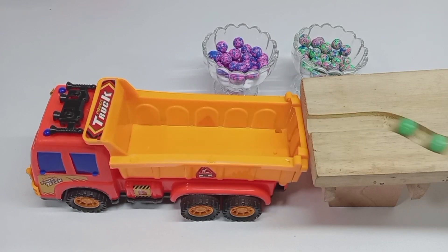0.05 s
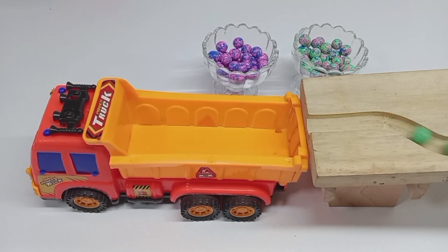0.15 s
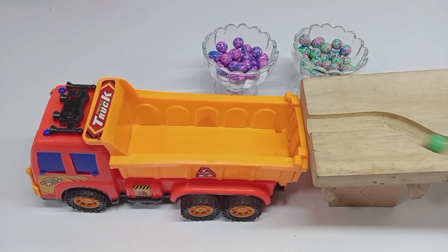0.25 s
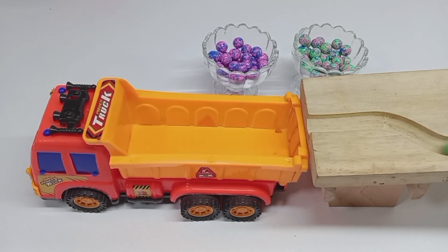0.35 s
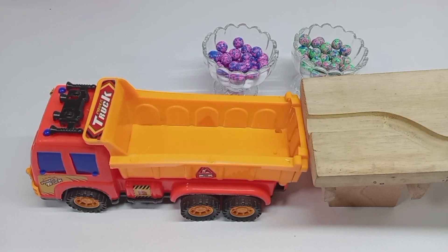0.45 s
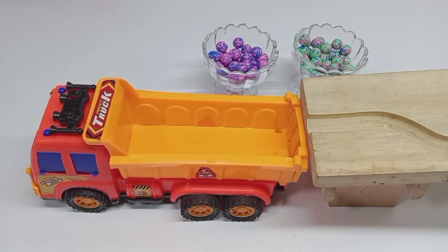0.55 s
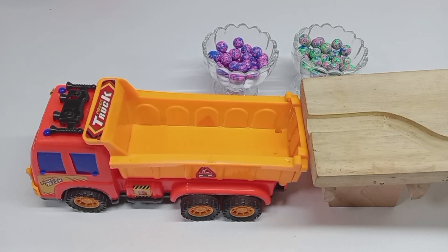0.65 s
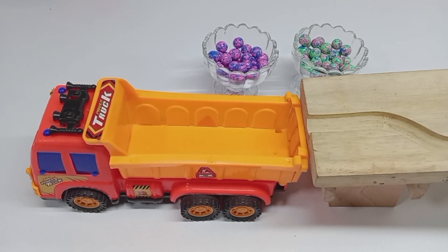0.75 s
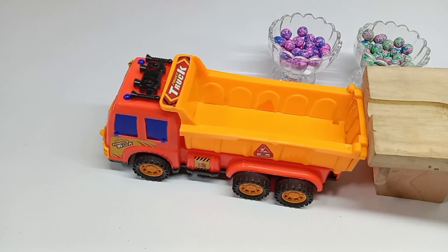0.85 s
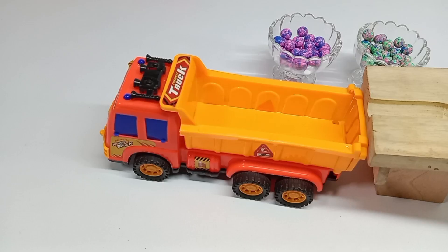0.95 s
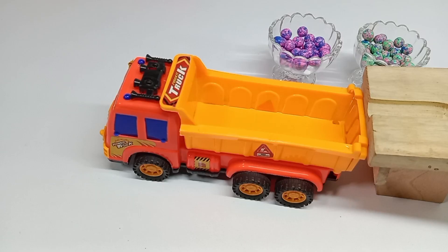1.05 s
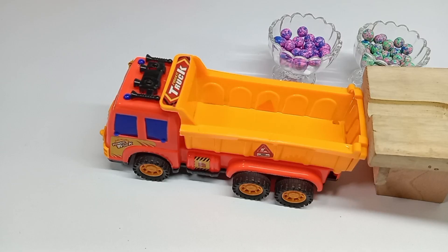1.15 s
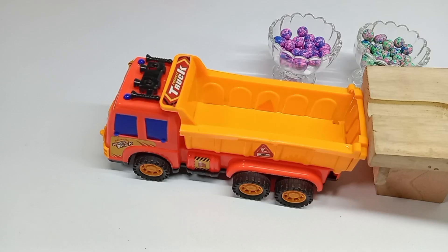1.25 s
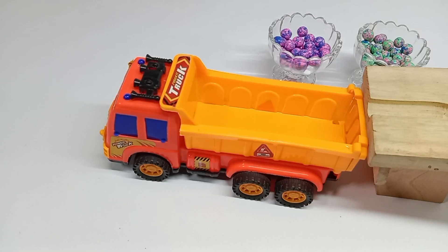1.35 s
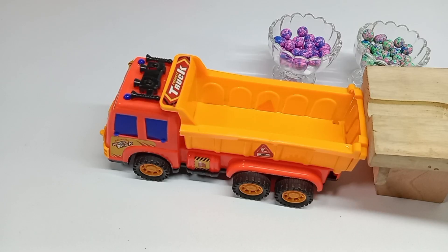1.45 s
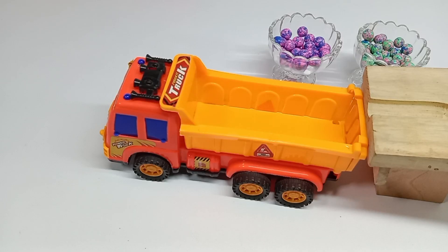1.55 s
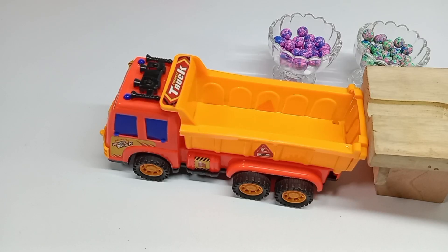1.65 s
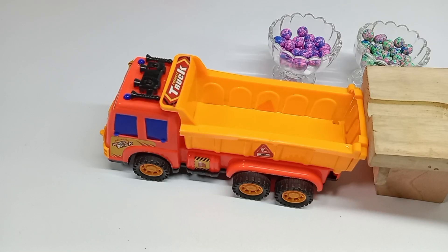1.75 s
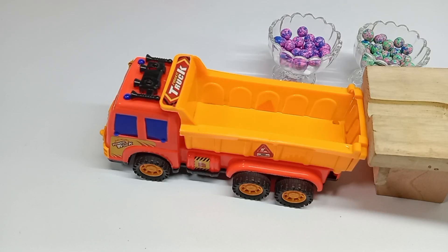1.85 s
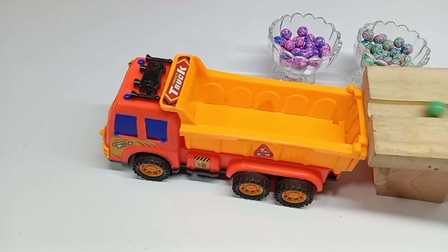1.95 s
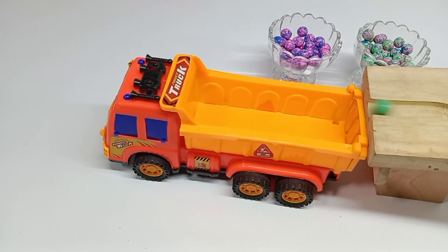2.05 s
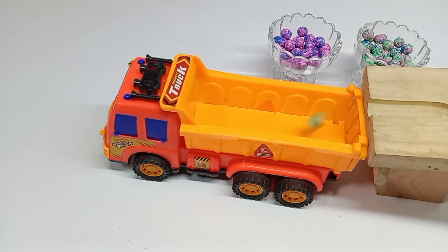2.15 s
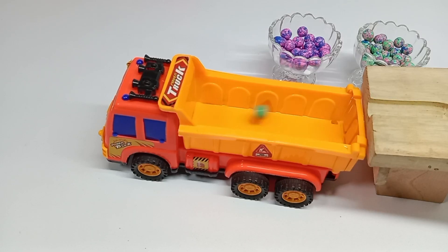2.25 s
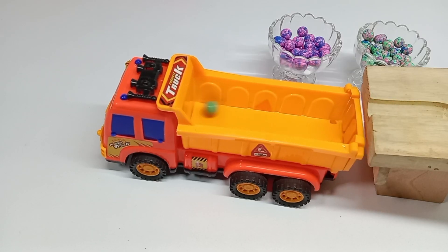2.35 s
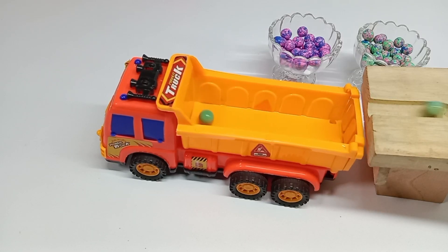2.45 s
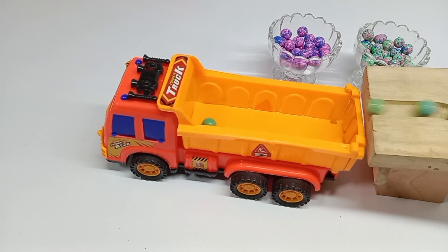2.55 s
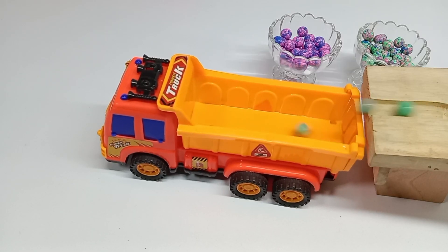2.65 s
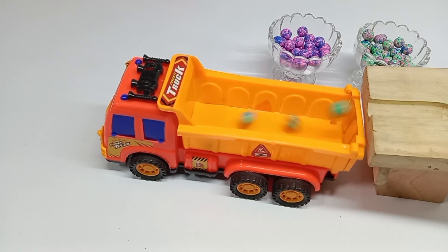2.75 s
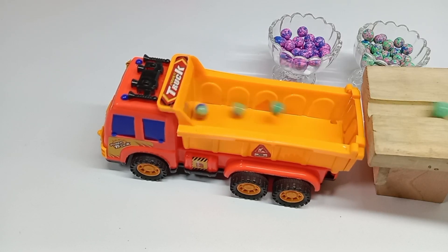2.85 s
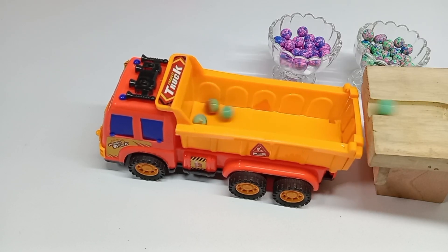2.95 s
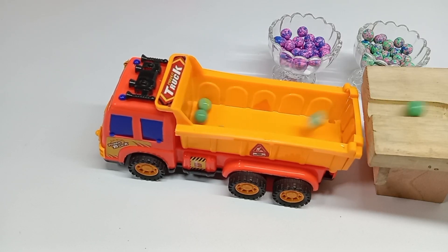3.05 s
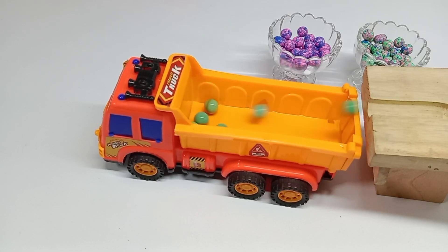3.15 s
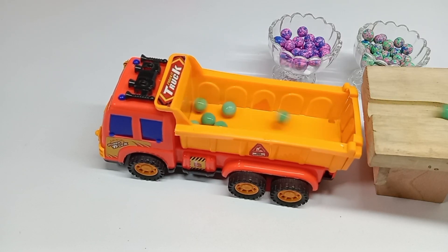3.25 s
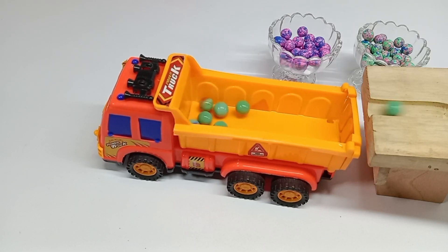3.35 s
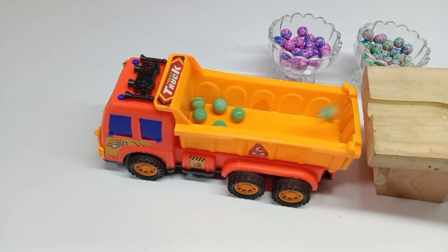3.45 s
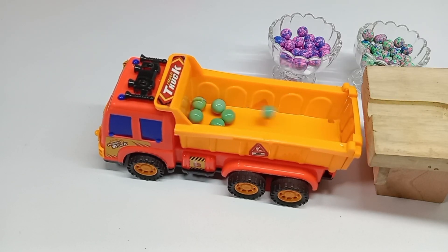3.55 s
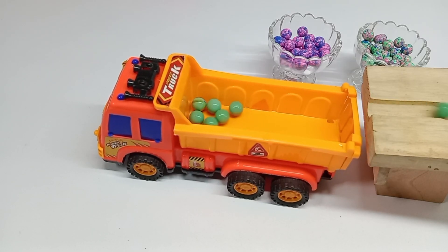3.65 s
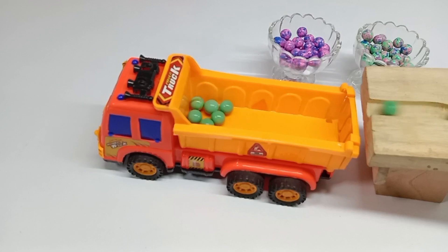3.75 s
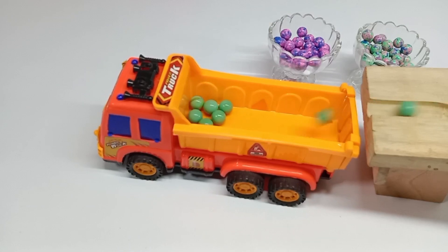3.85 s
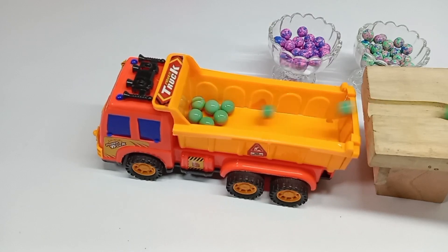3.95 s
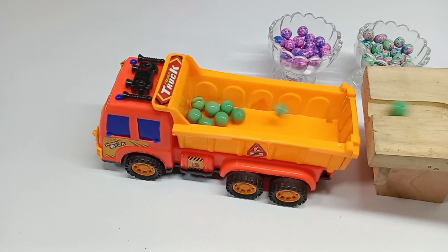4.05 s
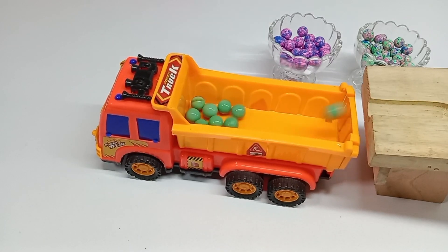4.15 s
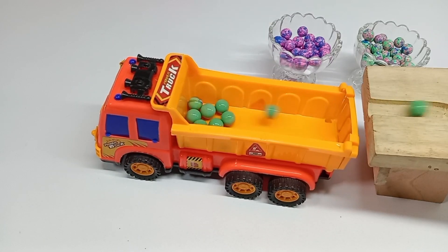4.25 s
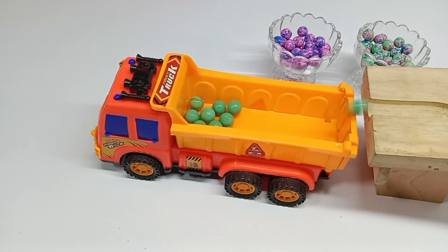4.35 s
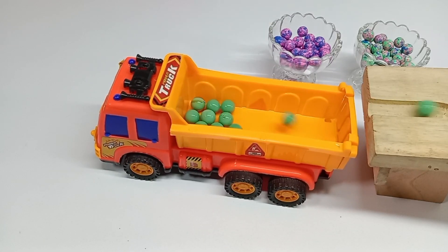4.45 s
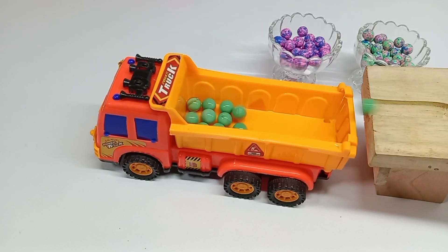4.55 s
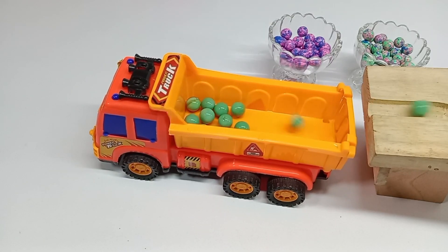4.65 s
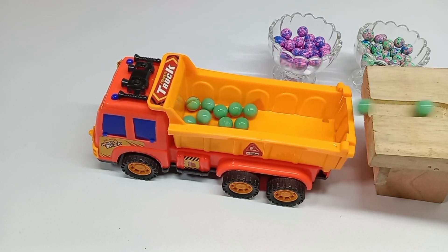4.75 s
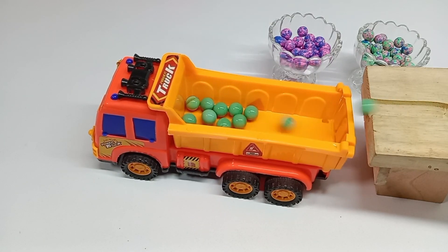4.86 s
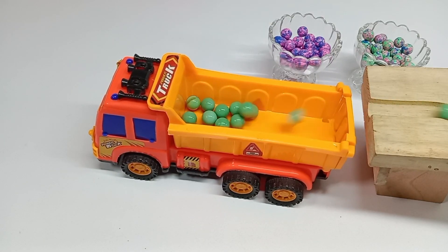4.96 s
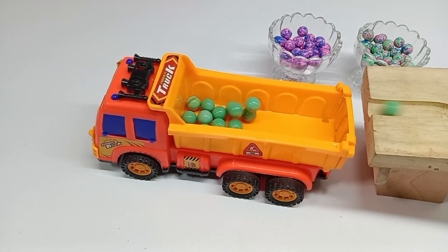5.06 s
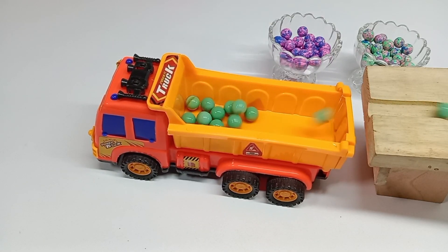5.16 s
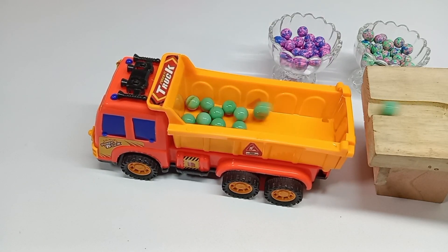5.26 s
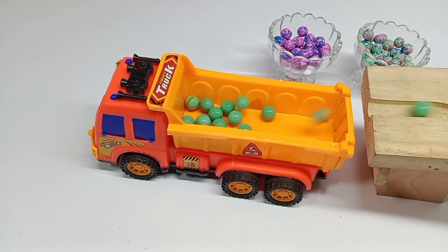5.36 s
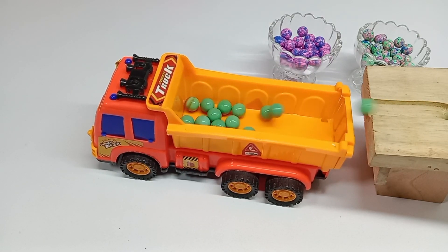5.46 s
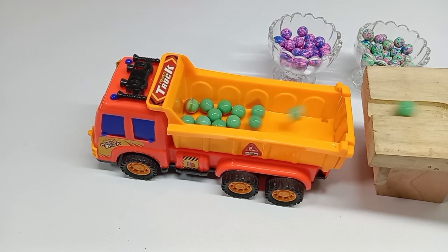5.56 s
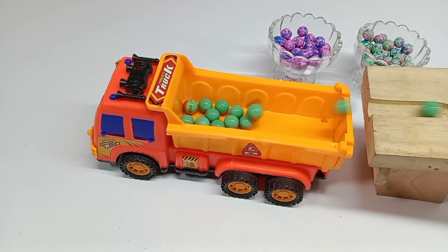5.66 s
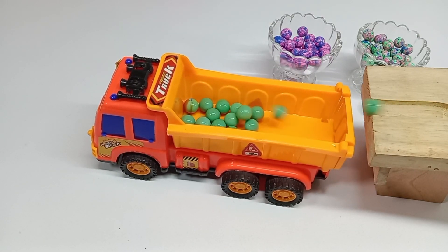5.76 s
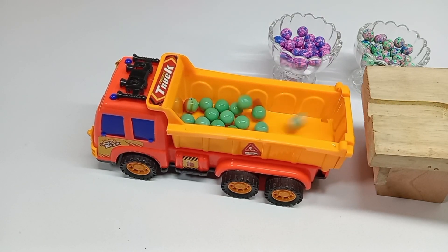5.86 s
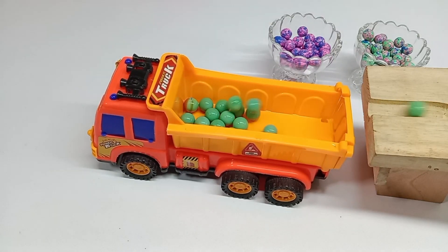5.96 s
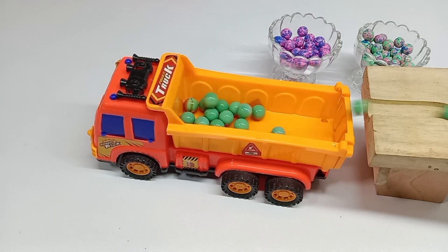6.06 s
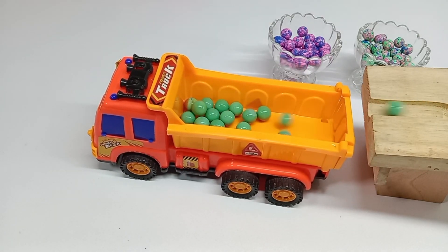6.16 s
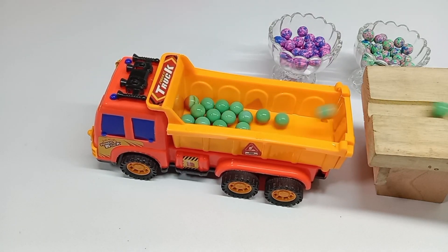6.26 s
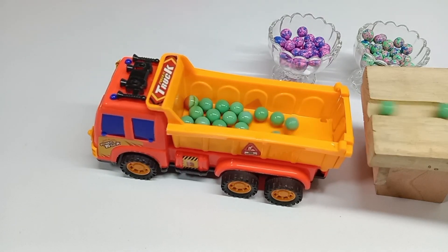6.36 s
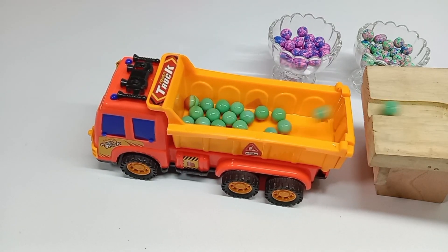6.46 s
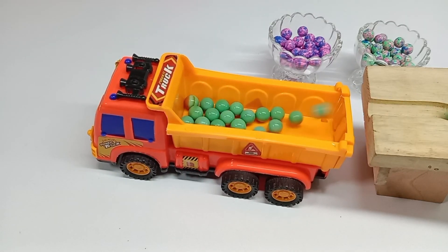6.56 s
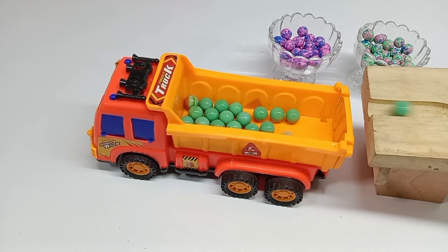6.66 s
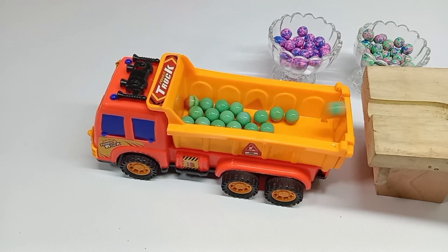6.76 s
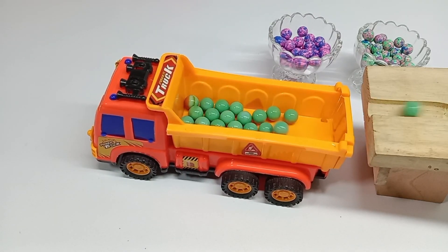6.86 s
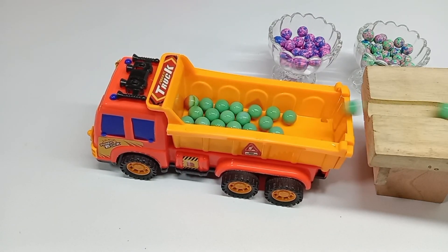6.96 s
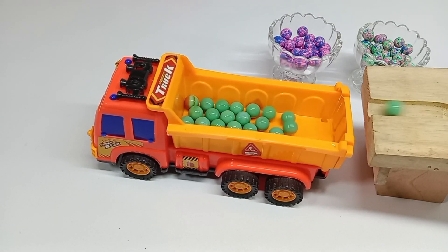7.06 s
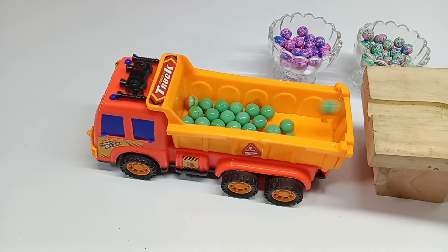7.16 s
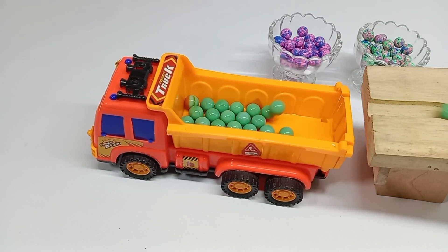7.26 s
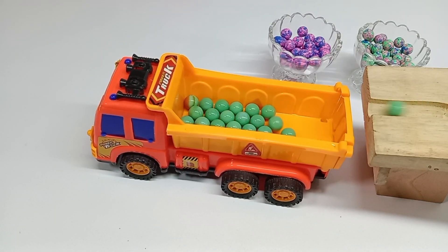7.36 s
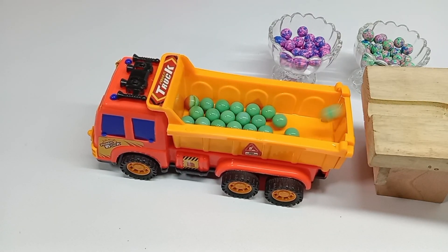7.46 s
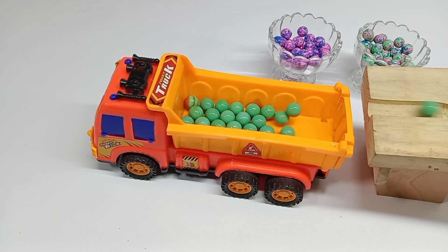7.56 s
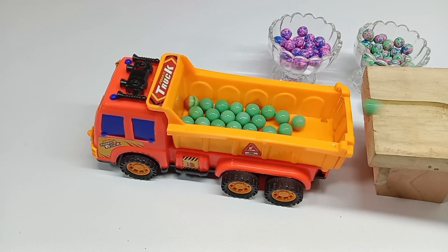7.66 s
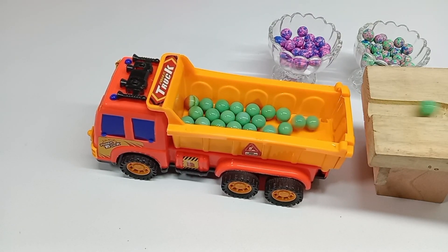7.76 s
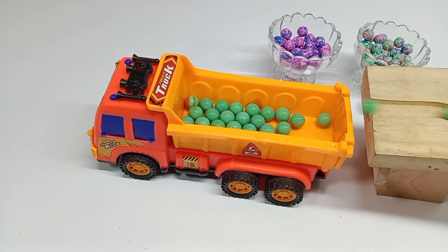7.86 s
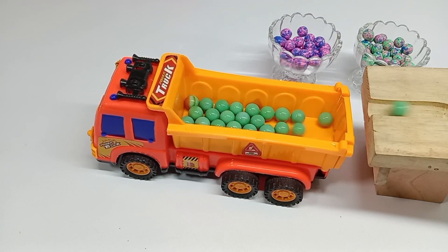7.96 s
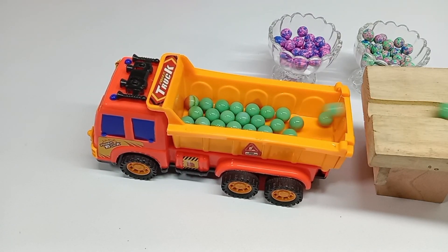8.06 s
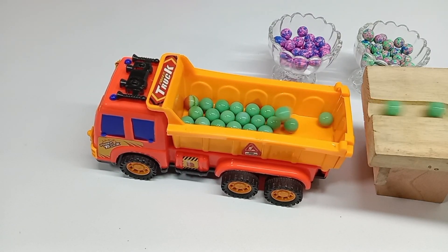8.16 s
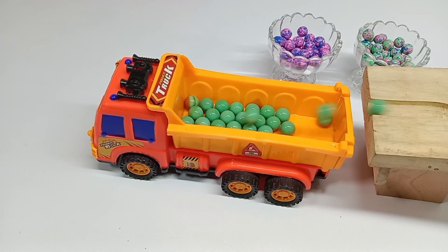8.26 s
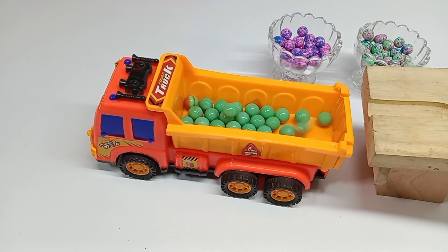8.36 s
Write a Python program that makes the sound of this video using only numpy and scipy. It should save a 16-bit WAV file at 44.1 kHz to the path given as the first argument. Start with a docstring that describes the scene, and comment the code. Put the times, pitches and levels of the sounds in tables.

```python
"""Marbles on a ramp and in a truck bed

Glass marbles run down a grooved wooden ramp and drop into the plastic bed of a toy truck, where they bounce,
roll and clack. A faint, muffled roll with hiss and ticks opens; a dull rumble lies under the clatter.
Contacts excite decaying modes, rolling is noisy bumps through resonances, and a small room answers with
decaying noise. The level dips just before some hard contacts."""
import sys
import numpy as np
from scipy import signal
from scipy.fft import rfft, irfft, next_fast_len
from scipy.io import wavfile
from scipy.ndimage import uniform_filter1d, minimum_filter1d, map_coordinates

SR = 44100
rng = np.random.default_rng(int(sys.argv[2]) if len(sys.argv) > 2 else 0)


def volts_from_decibels(level):
    """Turn decibel levels (scalar or array-like) into linear amplitude factors."""
    exponent = np.asarray(level, float) / 20
    return 10 ** exponent


def pcm_store(signal):
    """Save signal as 16-bit PCM."""
    levels = np.round(np.clip(np.atleast_2d(signal), -1, 1) * 32767)
    wavfile.write(sys.argv[1], SR, levels.astype(np.int16).T)


N = 370881  # length in samples

# resonances of the plastic bed and of the wooden ramp: (frequency [Hz], bandwidth [Hz], level [dB])
BED_MODES = [(392, 11, -21), (452.4, 14.4, -5.5), (678, 44, 0), (745, 22.5, 1), (860, 106, 4.5),
             (1082, 115, 2.5), (1250, 144, 7), (1443, 83, 2.5), (1600, 47, 4.5), (1840, 60, -1.5),
             (2156, 190, -10), (2864, 75, -6)]
RAMP_MODES = [(625, 192, -7), (1137, 21.4, 4.5), (1507, 160, -9), (1740, 35, -1.5), (1860, 52, -4.5),
              (2560, 89, -15), (3106, 100, -13.5)]
FIRST_DROP_S = 2.32  # the bed is empty before this


def unit(x):
    """Normalisation: scales a signal to rms 1."""
    return x / np.sqrt(np.mean(x ** 2) + 1e-20)


def peak_one(x):
    """Normalisation: scales a signal to a peak of 1."""
    return x / np.abs(x).max()


def along(points, hz):
    """Interpolates (frequency [Hz], value) points on a logarithmic frequency axis."""
    f, v = np.transpose(points)
    return np.interp(np.log(hz + 1), np.log(f + 1), v)


def levels(rows):
    """Envelopes: one gain per sample for each dB column, near silent before the first row, held after the last."""
    s, *columns = np.transpose(rows)
    return [volts_from_decibels(np.interp(np.arange(N) / SR, s, db, -120, db[-1])) for db in columns]


def filtered(x, response):
    """Linear filtering: multiplies the spectrum by a complex response of frequency."""
    m = next_fast_len(N + SR // 2)
    return irfft(rfft(x, m) * response(np.fft.rfftfreq(m, 1 / SR)), m)[:N]


def resonant(x, peaks):
    """Modal superposition: sums second-order resonances of alternating sign, scaled to rms 1."""
    def response(f):
        total = 0
        for k, (centre, width, db) in enumerate(peaks):
            resonance = 1j * f * width / (centre * centre - f * f + 1j * f * width)
            total = total + (-1) ** k * volts_from_decibels(db) * resonance
        return total
    return unit(filtered(x, response))


def coloured(x, spectrum):
    """Spectral shaping: gives x a smooth (frequency [Hz], level [dB]) colour, scaled to rms 1."""
    return unit(filtered(x, lambda hz: volts_from_decibels(along(spectrum, hz))))


def bumps(per_s, spread_db, smooth):
    """Shot noise: tiny random impulses of uneven but bounded size on a bed of smooth noise."""
    when, size, noise = rng.random(N), rng.exponential(size=N), rng.standard_normal(N)
    bounded_size = volts_from_decibels(spread_db * np.tanh(size / 3) * 3)
    impulses = (when < per_s / SR) * np.sign(noise) * bounded_size
    return unit(impulses) + smooth * rng.standard_normal(N)


def opening():
    """Low-passed shot noise in resonances, a rising band of hiss and short noise ticks precede the clatter."""
    # the muffled low roll swells twice and drops away: (time [s], level [dB])
    far_levels = [(0, -49), (0.15, -48.5), (0.38, -43), (0.4, -50), (0.66, -45.5), (0.68, -52.5),
                  (0.98, -53.5)]
    # resonances of the low roll: (frequency [Hz], bandwidth [Hz], level [dB])
    far_modes = [(158, 54, -4), (237, 28, -4.5), (329, 37, 3), (540, 22, -4.5)]
    # colour of the hiss: (frequency [Hz], level [dB])
    hiss_colour = [(900, -19), (1400, -8), (1900, 3), (2500, -6), (3200, -18), (4500, -19), (4800, -110)]
    # the hiss creeps up as the marbles near: (time [s], level [dB])
    nearing = [(0, -69), (.45, -66), (.98, -53)]
    # faint ticks and thuds that swell and stop short: (end [s], peak level [dB], centre frequency [Hz])
    ticks = [(.207, -43, 1900), (0.241, -43, 1900), (0.388, -37, 550), (.618, -42, 1650), (0.667, -30, 400),
             (0.992, -40, 6000)]
    t = np.arange(N) / SR
    low_gain, = levels(far_levels + [(0.97, -120)])
    hiss_gain, = levels(nearing + [(1, -120)])
    lumpy = bumps(40, spread_db=1.5, smooth=3)
    muffled = filtered(lumpy, lambda hz: 1 / (1 + (hz / 1200) ** 6))
    out = low_gain * resonant(muffled, far_modes)
    out += hiss_gain * coloured(rng.standard_normal(N), hiss_colour[:4] + [(2900, -110)])
    top_share = np.interp(t, [.5, .7], [0, .3])  # the hiss gains its top later
    out += top_share * hiss_gain * coloured(rng.standard_normal(N), [(2300, -63.5)] + hiss_colour[3:])
    for end, db, centre in ticks:
        burst = rng.standard_normal(N) * np.exp(-np.abs(t - end) / .004) * (t < end)
        # a bell on the octave axis, narrower at higher pitch
        tick = filtered(burst, lambda f: np.exp(-np.log2((f + 1) / centre) ** 2 * (centre / 500) ** 1.5))
        out += volts_from_decibels(db) * peak_one(tick)
    return out


def rumble():
    """Amplitude-modulated low noise: a dull, uneven rumble of table and room lies under the clatter."""
    # colour of the bass: (frequency [Hz], level [dB])
    bass_colour = [(25, -12), (80, -7.5), (130, -6), (230, 9.5), (400, 11), (1400, -100)]
    uneven = map_coordinates(rng.standard_normal(80), [np.arange(N) * 7 / SR])  # 7 random points per second
    gain, = levels([(0, -53.5), (1.1, -62.5), (1.6, -54.5), (3, -53), (5, -49)])
    return gain * volts_from_decibels(2.54 * uneven) * coloured(rng.standard_normal(N), bass_colour)


def rolling():
    """Roughness excitation: small bumps shake ramp and bed; jostling glass patters, brighter on the ramp."""
    # steady rolling: (time [s], rumble level [dB], glass jostle level [dB])
    rolling_levels = [(0.99, -50, -55), (1.03, -44, -49.5), (1.16, -35, -58), (1.18, -32, -39),
                      (1.27, -39, -44), (1.3, -23.5, -40), (1.5, -31, -35), (1.75, -35, -32.5),
                      (2.0, -31, -37.5), (2.3, -32.5, -37.5), (2.4, -29, -34.5), (3.2, -25, -31),
                      (4.0, -25, -35), (4.4, -23.5, -32), (5.6, -22.5, -31), (6.4, -22, -31.5),
                      (7.4, -22.5, -32.5), (8.4, -22, -32.5)]
    # power share of the rolling that comes from the bed: (time [s], share [0-1])
    bed_share = [(2.322, 0), (2.34, 0.5), (2.75, 0.17), (2.85, 0.37), (5, 0.7)]
    # colour of many small glass contacts, in the bed and on the ramp: (frequency [Hz], level [dB])
    bed_glass = [(2000, -19), (4400, -10), (5200, 7.5), (6300, -5.5), (8000, -8.5), (9500, -35),
                 (12000, -27), (15200, -20)]
    ramp_glass = [(2400, -41), (4200, -29), (5600, 6.5), (7600, 5), (10500, -19), (15200, -18)]
    roll_gain, jostle_gain = levels(rolling_levels)
    share = np.clip(np.interp(np.arange(N) / SR, *np.transpose(bed_share)), 0, 1)
    bed = resonant(bumps(300, spread_db=4.5, smooth=.55), BED_MODES + [(3450, 300, -10)])
    ramp = resonant(bumps(300, spread_db=4, smooth=.9), RAMP_MODES)
    bed_patter = coloured(bumps(600, spread_db=3.8, smooth=.7), bed_glass)
    ramp_patter = coloured(bumps(500, spread_db=4.5, smooth=1.2), ramp_glass)
    uneven = map_coordinates(rng.standard_normal(N // 2000), [np.arange(N) * 18 / SR])
    roll_gain = roll_gain * volts_from_decibels(1.5 * uneven)
    in_bed = roll_gain * bed + jostle_gain * bed_patter
    on_ramp = roll_gain * ramp + jostle_gain * ramp_patter
    return np.sqrt(share) * in_bed + np.sqrt(1 - share) * on_ramp


def all_contacts():
    """Excitation list: rows of (time [s], knock, ring and clack [dB], favoured pitch [Hz], glass modes)."""
    # marbles knocking on the ramp: (time [s], knock level [dB])
    ramp_knocks = [(1.1709, -15), (1.2754, -17), (1.2913, -9.5), (1.3003, -10), (1.33, -13), (1.359, -12),
                   (1.473, -21), (2.2324, -20.5)]
    # marbles striking the bed:
    # (time [s], knock level [dB], wall ring level [dB], glass clack level [dB], favoured pitch [Hz])
    blows = [(2.3335, 0, -12, -10, 1040), (2.4367, -5.5, -14, -3, 1130), (2.4911, -6, -33, -29, 1630),
             (2.5459, -6, -25, -7, 726), (2.8148, -3, -20, -6, 1090), (2.9046, -3, -9.5, -26, 856),
             (2.9294, -9, -17, -7.5, 780), (2.9666, -2.5, -4, -9, 860), (3.0083, -7, -23, -9, 725),
             (3.079, -6.5, -29, -9, 1290), (3.1721, -9, -20, -5, 754), (3.2084, -6, -34, -8, 1200),
             (3.234, -4, -11, -10, 850), (3.3357, -7, -23, -4.5, 1250), (3.3834, 0.5, -7, -6.5, 1130),
             (3.4767, -4.5, -14, 2, 1370), (3.5106, -9, -34, -6, 750), (3.5435, -8, -37, -22, 980),
             (3.6531, -1, -7, -8, 890), (3.7543, -4, -8, 1.5, 1250), (3.7863, -8.5, -28, -9.5, 1170),
             (3.8208, -9.5, -27, -7, 800), (4.0439, 0, -7, -4, 1130), (4.1492, -3, -25, -0.5, 1220),
             (4.1759, -4.5, -14, -17, 1260), (4.3028, -5.5, -25, -7, 910), (4.3602, 0, -6.5, -6, 1110),
             (4.4607, -2, -24, -4, 1310), (4.5319, -6.5, -26, -12, 1250), (4.5911, -3, -10, -10, 1180),
             (4.7027, -5.5, -13, -2, 1210), (4.7772, -11, -25, -9, 1250), (4.8061, -3, -12.5, -8, 1140),
             (4.9111, -1.5, -25, 0, 810), (5.0116, -4, -8, -9, 860), (5.0638, -4, -20, -0.5, 610),
             (5.135, -6.5, -12.5, -9, 910), (5.1979, -10, -36, -18, 1250), (5.2757, -4, -39, -17, 1290),
             (5.2968, -8.5, -29, -7, 1640), (5.3451, -4, -8.5, -6, 1940), (5.5433, -8, -20, -6.5, 1250),
             (5.6914, -2.5, -43, -6, 1590), (5.7397, -9.5, -16, -4, 910), (5.8772, -0.5, -12, -1, 1150),
             (6.026, -5.5, -9, -4, 840), (6.2151, -8, -19, -7, 1360), (6.2583, -5, -21, -5, 1170),
             (6.3057, -1, -12.5, 2, 1600), (6.3473, -6, -30, -7, 1210), (6.4196, -4, -19, -7, 1200),
             (6.4617, -7, -10, -2.5, 1520), (6.543, -7.5, -16, -21, 1160), (6.6563, -4.5, -8, -6, 805),
             (6.6656, -4.5, -19, -15, 1580), (6.751, 1, -16, 2, 1520), (6.9686, -8.5, -26, -8, 1220),
             (7.1016, -8, -18, -10, 1180), (7.1975, 1, -11, -3, 1310), (7.3143, -5, -13, -7.5, 1292),
             (7.3667, -12, -20, -13, 1080), (7.5141, -8, -16, -11, 1640), (7.5205, -4, -19, -21, 1080),
             (7.656, -2, -7, 0, 1240), (7.8194, -1.5, -5, -4, 1210), (7.9162, 2.5, -24, 2, 1570),
             (7.928, -6, -11, -6, 1240), (8.0012, -9, -21, -9, 1600), (8.1155, -1, -14, -2, 1290),
             (8.2564, -10.5, -14.5, -4.5, 1200), (8.3381, -8, -13, -7, 1356), (8.3557, -2.5, -19, -4, 1340)]
    # marbles clacking against each other: (time [s], clack level [dB])
    clacks = [(1.1713, -16), (1.1914, -14), (1.2925, -16), (1.3556, -7.5), (1.3868, -4.5), (1.417, -5),
              (1.4318, -1.5), (1.5228, -4), (1.6244, -9), (1.635, -12), (1.685, -6), (1.7324, -4.5),
              (1.778, -3), (1.8478, -3), (1.88, -5.5), (1.99, -15), (1.998, -5), (2.0543, -3.5),
              (2.101, -3.5), (2.1304, -7), (2.146, -10), (2.173, -6.5), (2.2, -6.5), (2.288, -4.5),
              (2.3488, -7.5), (2.4028, -6.5), (2.4219, -9), (2.457, -11), (2.511, -9), (2.526, -10.5),
              (2.6735, -0.5), (3.047, -5.5), (3.1125, -5.5), (3.308, -10), (3.374, -8), (3.6203, -11.5),
              (3.731, -7.5), (4.116, -11), (4.278, -6.5), (4.446, -6), (4.481, -3.5), (4.5457, -3.5),
              (4.8645, -9), (4.9038, 2.5), (5.1705, -6.5), (5.2151, -7), (5.4413, -6), (5.6425, -7),
              (6.0363, -13), (6.153, -6.5), (6.3237, -9), (6.385, -9), (6.444, -6), (6.649, -1.5),
              (6.699, -4.5), (7.192, -7), (7.203, -8), (8.2973, -8)]
    # lighter knocks in the bed: (time [s], peak level [dB])
    light_knocks = [(2.552, -7.5), (4.92, -6.5), (5.116, -4.5), (5.245, -6.5), (5.322, -5), (5.393, -6.5),
                    (5.827, -4.5), (6.062, -4.5), (6.127, -11), (6.189, -7), (6.727, -13.5), (6.773, -5),
                    (6.897, -5), (6.932, -15), (6.985, -5.5), (7.155, -4), (7.213, -4), (7.462, -8),
                    (7.489, -4), (7.563, -2.5), (7.596, -13), (7.867, -6), (7.951, -5.5), (8.173, -8)]
    # levels of a light knock over its peak level: (knock [dB], ring [dB], clack [dB])
    light_offsets = (-6.5, -20.5, -7)
    # modes of glass on plastic, and of glass on glass: (frequency [Hz], level [dB])
    plastic_clack = [(5900, 16), (7600, -8)]
    glass_clack_modes = [(5900, 4), (6900, 8), (8000, 4.5)]
    ramp_knock_hz = 2310  # a knock on wood wakes the higher modes
    under_db, wall_db = -33, -22  # how little a clack shakes the wood or plastic under it, and the wall
    light = [(s, *np.add(db, light_offsets), rng.uniform(1000, 1700)) for s, db in light_knocks]
    on_ramp = [(s, db, -120, -120, ramp_knock_hz) for s, db in ramp_knocks]
    rows = [(*row, plastic_clack) for row in [*blows, *on_ramp, *light]]
    for s, db in clacks:
        ring_db = db + wall_db if s > FIRST_DROP_S else -120
        rows.append((s, db + under_db, ring_db, db, ramp_knock_hz, glass_clack_modes))
    return rows


def body_knock(t, modes, spot_hz, strength, detune, phase):
    """Modal impact: the struck spot lifts the modes near one pitch; each mode decays exponentially."""
    favour_db, favour_octaves = 11, 0.15
    damping, rise_s = 0.099, 0.00037  # extra loss [1/s per Hz]; rise time
    hz, width, db = np.transpose(modes)[:, :, None]
    strength, detune, phase = strength[-len(hz):], detune[-len(hz):], phase[-len(hz):]
    db = db + favour_db * np.exp(-.5 * (np.log2(hz / spot_hz) / favour_octaves) ** 2)
    sines = volts_from_decibels(db + 3 * strength) * np.sin(2 * np.pi * hz * (1 + .008 * detune) * t + phase)
    decay = np.exp(-(np.pi * width + damping * hz) * t)
    return peak_one(np.sum(sines * decay, 0) * (1 - np.exp(-t / rise_s)))


def wall_ring(t, detune):
    """Damped oscillation: one mode of the bed's wall rings briefly."""
    wall_hz, decay_s, rise_s = 3520, 0.0026, .0003
    sine = np.sin(2 * np.pi * wall_hz * (1 + .01 * detune[0]) * t)
    return peak_one(sine * np.exp(-t / decay_s) * (1 - np.exp(-t / rise_s)))


def glass_clack(t, glass, strength, detune):
    """Contact resonance: glass modes rise and die within a millisecond or so, then two weaker copies follow."""
    def delayed(x, lag):
        return np.pad(x, (round(lag * SR), 0))[:len(x)]
    hz, db = np.transpose(glass)[:, :, None]
    sines = np.sin(2 * np.pi * hz * (1 + .04 * detune[1:][:len(glass)]) * t)
    modes = volts_from_decibels(db + 2 * strength[1:][:len(glass)]) * sines
    clack = peak_one(np.sum(modes, 0) * t * np.exp(-t / 0.00024))
    stretch = volts_from_decibels(strength[0, 0])
    clack = clack + .5 * delayed(clack, .0011 * stretch)  # a rebound
    return clack + .3 * delayed(clack, .0033 * stretch)  # the table's echo


def contact_edge(t, crack):
    """Impulsive broadband radiation: a high-passed noise burst with a short, weaker rattle after it."""
    sharp = signal.butter(2, 13000, "high", fs=SR)
    return peak_one(signal.lfilter(*sharp, crack) * (np.exp(-t / 0.00043) + .1 * np.exp(-t / .02)))


def contact_slap(t, crack):
    """Damped band noise: the blow's noisy slap."""
    broad = signal.butter(2, (1300, 3800), "band", fs=SR)
    return peak_one(signal.lfilter(*broad, crack[::-1]) * np.exp(-t / 0.0043))


def contacts():
    """Superposed impacts: each contact sums knock, slap, clack and edge; the wall's ring is returned apart."""
    out, t, rows = np.zeros((2, N + SR)), np.arange(SR // 16) / SR, all_contacts()
    luck = rng.standard_normal((len(rows), 3, len(BED_MODES) + 4, 1))
    cracks = rng.standard_normal((len(rows), len(t)))
    for row, (strength, detune, phase), crack in zip(rows, luck, cracks):
        s, knock_db, ring_db, clack_db, spot_hz, glass = row
        modes = BED_MODES if s > FIRST_DROP_S else RAMP_MODES
        knock = body_knock(t, modes, spot_hz, strength, detune, phase) + 0.71 * contact_slap(t, crack)
        clack = volts_from_decibels(clack_db) * glass_clack(t, glass, strength, detune)
        ring = volts_from_decibels(ring_db + 2 * strength[0]) * wall_ring(t, detune)
        # the harder the contact, the stronger its edge
        edge = (volts_from_decibels(clack_db - 6) + volts_from_decibels(ring_db)) * contact_edge(t, crack)
        start = round((s - .0003) * SR)
        out[:, start:start + len(t)] += [volts_from_decibels(knock_db) * knock + clack + edge, ring]
    return out[:, :N]


def room(x):
    """Reverberation: noise tails decay at a rate set by frequency; the marbles move, so the tails keep changing."""
    # reverberation time: (frequency [Hz], time to fall 60 dB [s])
    decay_times = [(300, 0.69), (2000, 1), (6000, 0.68), (14000, 0.45)]
    out, step = np.zeros(N + 2 * SR), SR // 8
    for start in range(0, N, step):
        hz, t, z = signal.stft(rng.standard_normal(SR // 3), SR, nperseg=256)
        decay = volts_from_decibels(-60 * t / along(decay_times, hz)[:, None])
        tail = signal.istft(z * decay, SR, nperseg=256)[1]
        wet = signal.fftconvolve(x[start:start + step], tail / np.linalg.norm(tail))
        out[start + 120:][:len(wet)] += wet  # the answer starts 120 samples late
    return out[:N]


def level_dips():
    """Gain modulation: the level sinks at a moment on a steady grid and is back at each listed end."""
    # dips just before some hard contacts: (end [s], depth [dB])
    dips = [(1.522, -7.5), (1.73, -10), (2.332, -8), (2.815, -11), (3.652, -7), (4.042, -11), (4.59, -6),
            (5.01, -4.5), (5.343, -6), (5.542, -9.5), (5.74, -8.5), (6.967, -13.5), (7.365, -10),
            (7.653, -8.5), (8.258, -11)]
    grid_s, offset_s, shortest_s = .02, .005, .008
    t, db = np.arange(N) / SR, np.zeros(N)
    for end, depth_db in dips:
        start = np.floor((end - shortest_s - offset_s) / grid_s) * grid_s + offset_s
        db += np.interp(t, [start - .002, start, end - .001, end], [0, depth_db, depth_db, 0])
    return volts_from_decibels(db)


def scene():
    """Superposition: contacts, their room and the rolling radiate little bass; rumble and opening are added."""
    (blows, rings), dips = contacts(), level_dips()
    wet = volts_from_decibels(-5.5) * room(blows + .3 * rings)
    clatter = dips * (blows + rings + wet + rolling())
    thin = filtered(clatter, lambda hz: (1j * hz / (330 + 1j * hz)) ** 3)  # third-order high-pass
    return (thin + dips * rumble() + opening())[None]


def band_limit(x):
    """A steep low-pass at the top of the band."""
    return signal.sosfilt(signal.butter(12, 16800, fs=SR, output="sos"), x)


def record(dry):
    """Band limiting and peak limiting: little is kept above 15.4 kHz and a fast limiter holds the peaks."""
    x = filtered(dry[0], lambda hz: volts_from_decibels(np.interp(hz, [15400, 15600, 16500, 16700], [0, -24, -30, -90])))
    need = np.minimum(1, .88 / (np.abs(x) + 1e-9))
    gain = uniform_filter1d(minimum_filter1d(need, size=201), size=201)
    return band_limit((x * gain)[None])


dry = scene()
out = record(dry)
pcm_store(out)
```